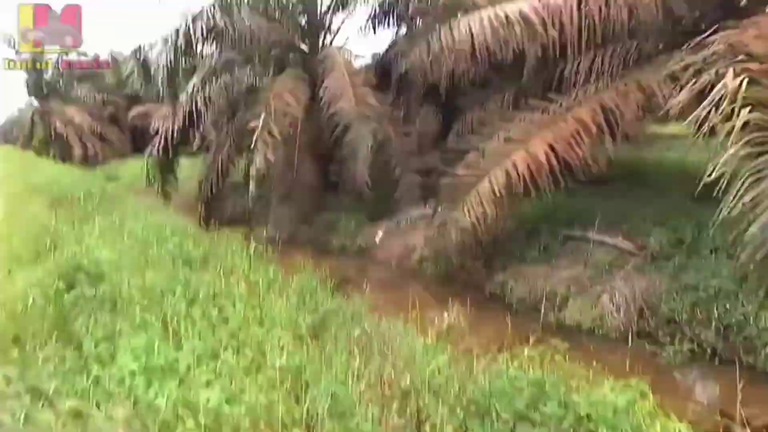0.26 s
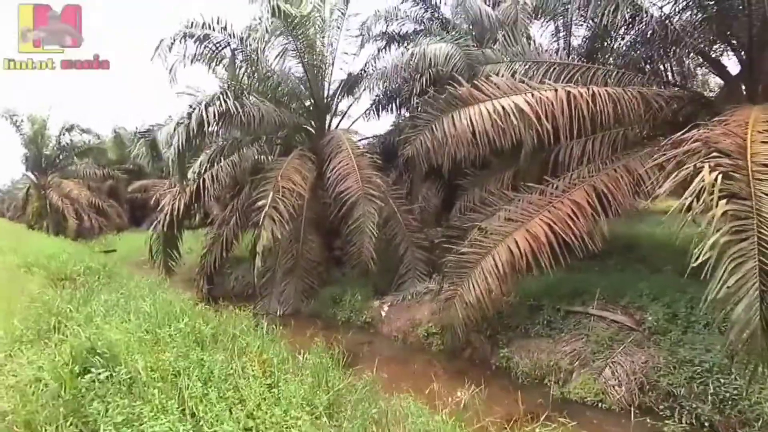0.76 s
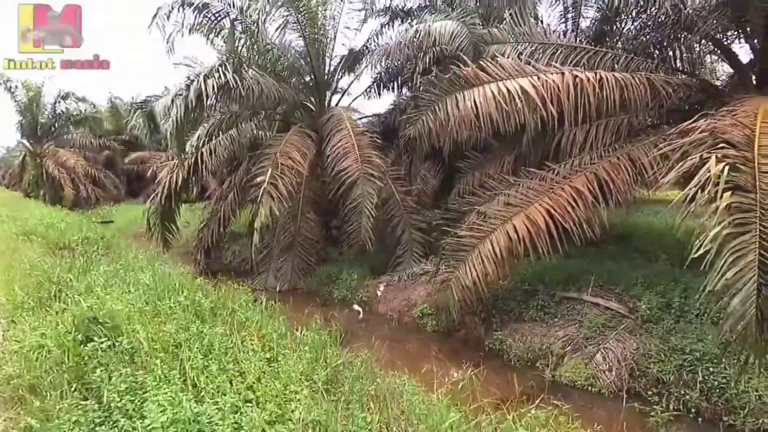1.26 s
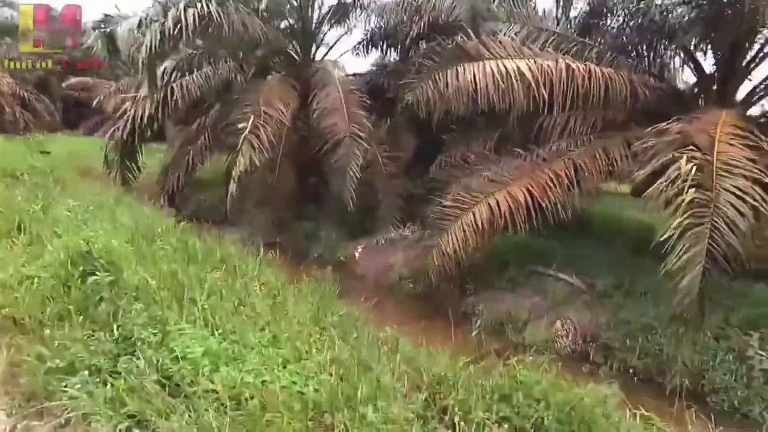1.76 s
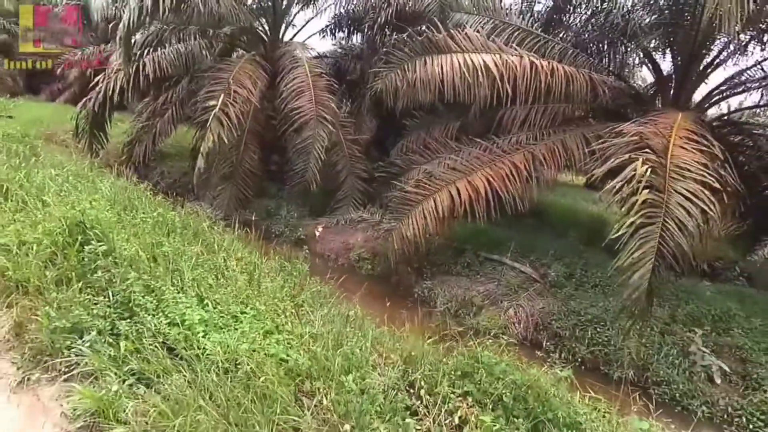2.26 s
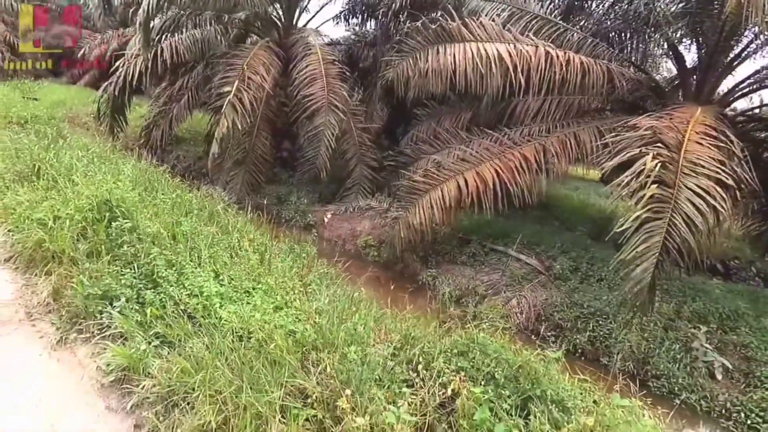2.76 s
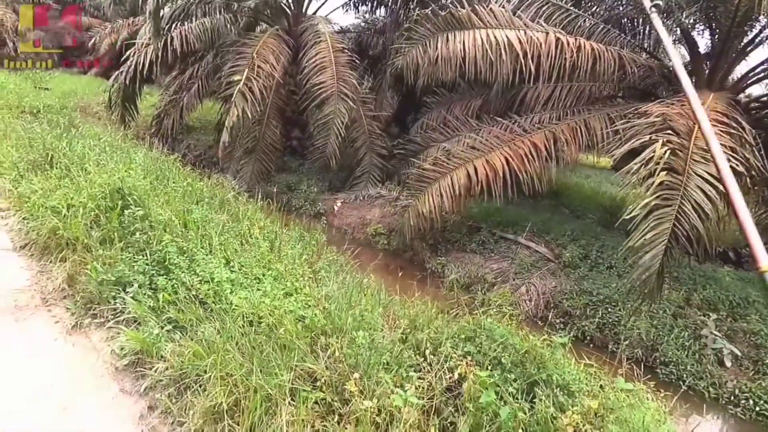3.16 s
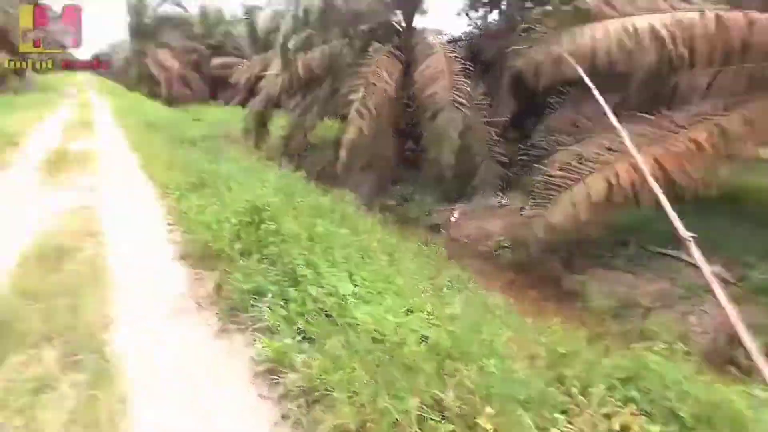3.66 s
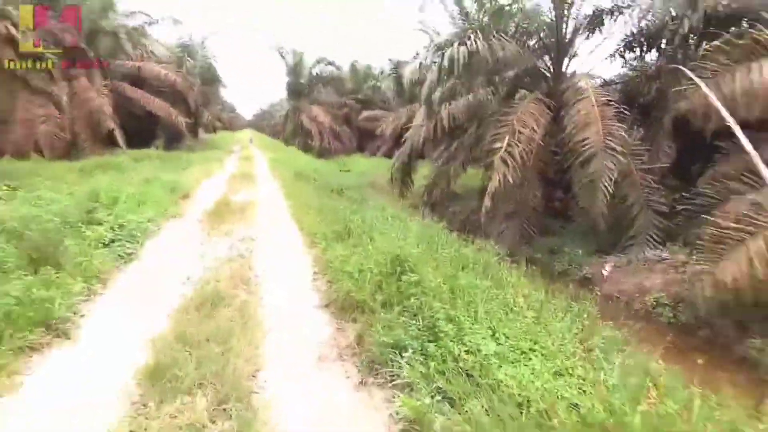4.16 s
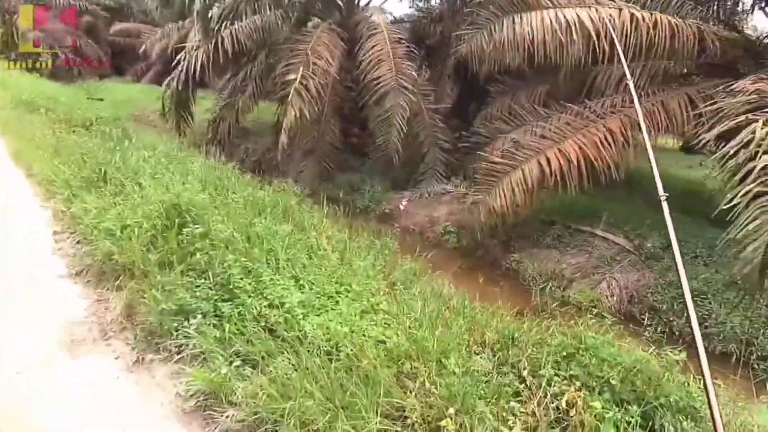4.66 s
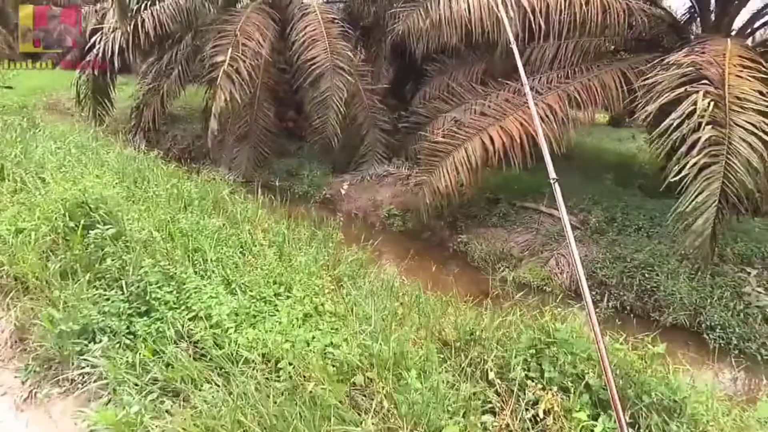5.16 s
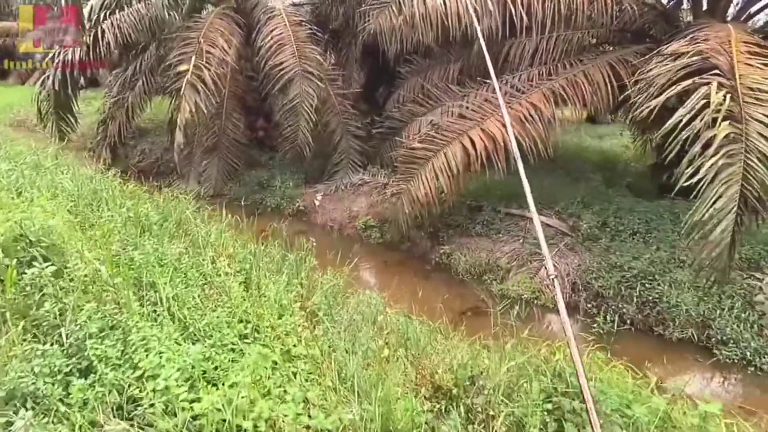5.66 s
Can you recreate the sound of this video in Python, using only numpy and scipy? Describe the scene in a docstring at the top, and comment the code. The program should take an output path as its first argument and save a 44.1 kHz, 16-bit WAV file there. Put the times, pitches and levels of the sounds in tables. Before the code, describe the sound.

Someone walks through dry grass outdoors, soles crunching, stems cracking and gear knocking lightly, while high-pitched insects rasp continuously around.

```python
"""Soft footsteps close to the microphone: someone with a fishing rod steps from a grass verge onto a dirt track.
Soles crunch and blades swish as shaped noise grains; dry stalks snap and tear; carried gear knocks as short
damped tones; one boot scuffs through stubble as stick-slip noise on ringing modes.
The place is a palm plantation: insects, as noise in high bands, hiss and crackle over very quiet open air."""
import sys
import numpy as np
from scipy import signal
from scipy.fft import rfft, irfft
from scipy.io import wavfile
from scipy.ndimage import uniform_filter1d, map_coordinates

SR = 44100
rng = np.random.default_rng(int(sys.argv[2]) if len(sys.argv) > 2 else 0)


def bounce(signal):
    """Save signal as a 16-bit WAV file at the path given by the first command-line argument."""
    frames = np.transpose(np.atleast_2d(signal))
    limited = np.clip(frames, -1, 1)
    pcm = np.round(limited * 32767).astype(np.int16)
    wavfile.write(sys.argv[1], SR, pcm)


N = 261072
TIME = np.arange(N) / SR


def from_db(db):
    """Decibels to gain."""
    return 10 ** (np.asarray(db) / 20)


def rms_one(x):
    """Scale to unit power."""
    return x / np.sqrt(np.mean(x ** 2) + 1e-20)


def in_time(rows):
    """Each column of a curve, sample by sample."""
    s, *columns = np.transpose(rows)
    return [np.interp(TIME, s, c) for c in columns]


def at_hz(points, hz):
    """Read a spectrum on a log-frequency axis."""
    f, value = np.transpose(points)
    return np.interp(np.log(np.maximum(hz, 1)), np.log(f), value)


def pan(balance_db):
    """Channel gains for a left-minus-right level."""
    return from_db(np.array([[.5], [-.5]]) * balance_db)


def drift(rate):
    """Smooth chance of spread 1 that changes about rate times a second."""
    knots = rng.standard_normal(4096)
    return rms_one(map_coordinates(knots, [TIME * rate], order=2, mode="wrap"))


def swell(s, db, half_s):
    """A bell-shaped gain round time s."""
    return from_db(db) * np.exp(-.5 * ((TIME - s) / half_s) ** 2)


def resonate(x, hz, width_hz):
    """A two-pole resonance with gain 1 on top."""
    r = np.exp(-np.pi * width_hz / SR)
    zeros = np.array([1, 0, -1]) * (1 - r * r) / 2
    poles = [1, -2 * r * np.cos(2 * np.pi * hz / SR), r * r]
    return signal.lfilter(zeros, poles, x + 1e-18)


def band(x, hz, width_hz):
    """A resonance applied twice: steep skirts."""
    return resonate(resonate(x, hz, width_hz), hz, width_hz)


def evened(x):
    """Hold unit power over every fortieth of a second, keeping the finer grain."""
    return x / np.sqrt(np.abs(uniform_filter1d(x ** 2, size=SR // 40)) + 1e-20)


def grains(per_s, spread_db, grain_s, bed):
    """Two noises broken into tiny bursts of uneven size, over a bed of bursts too many to tell apart."""
    sizes = from_db(spread_db * np.minimum(rng.exponential(1, N), 4))
    hits = (rng.random(N) < per_s / SR) * sizes ** 2
    power = signal.lfilter([1], [1, -np.exp(-2 / (grain_s * SR))], hits + 1e-18)
    return rng.standard_normal((2, N)) * np.sqrt(power / power.mean() + abs(bed))


def patchy(pair, depth_db, patch_s, patch_hz):
    """Random peaks and dips come and go across the spectrum of a noise."""
    hz, s, cells = signal.stft(pair, SR, nperseg=512)
    patches = rng.standard_normal((256, 1024))
    places = np.meshgrid(hz / patch_hz, s / patch_s, indexing="ij")
    field = map_coordinates(patches, places, order=2, mode="wrap")
    return signal.istft(cells * from_db(depth_db * field), SR, nperseg=512)[1][:, :N]


# how alike left and right arrive, before a sound's own spread: f/Hz, likeness (1 same, -1 opposed)
STEREO_LIKENESS = [(40, 0.58), (200, 0.96), (1000, 0.85), (2000, 0.53), (3200, 0.45), (5000, 0.23),
                   (8000, -0.15), (15000, 0.34)]


def colour(pair, spectrum, spread=1):
    """Give two noises a spectrum and mix them to left and right with the likeness above; unit power."""
    hz = np.arange(N // 2 + 1) * SR / N
    mid, side = rfft(pair) * from_db(at_hz(spectrum, hz))
    alike = np.clip(at_hz(STEREO_LIKENESS, hz) / spread, -.98, .98)
    common = np.sqrt(1 + alike) * mid
    opposed = np.sqrt(1 - alike) * side * [[1], [-1]]
    return rms_one(irfft(common + opposed, N))


def add(out, s, sound):
    """Mix a short sound in at time s."""
    start = round(s * SR)
    out[:, start:start + sound.shape[-1]] += sound[..., :N - start]


def small_body(x, low_hz=260):
    """Small things radiate hardly any bass."""
    return signal.sosfilt(signal.butter(2, low_hz, "high", fs=SR, output="sos"), x + 1e-18)


# colour of the open air: f/Hz, relative level/dB per Hz
AIR_COLOUR = [(25, -17), (105, -11.5), (140, -0.5), (180, -10), (350, 0.5), (700, -2.5), (1600, -5),
              (2400, -17), (4000, -10), (6000, -35), (12000, -6)]


def open_air(level_db=-60):
    """The faint, wide rush of the plantation: steady coloured noise."""
    return from_db(level_db) * colour(rng.standard_normal((2, N)), AIR_COLOUR, spread=2.8) * pan(0.33)


# farther insect choirs: f/Hz, width/Hz, level/dB before rise and waver, left-minus-right/dB
FAR_CHOIRS = [(3000, 380, -69.5, 3), (4500, 540, -65.5, 1.5), (6870, 590, -59.5, -3.5),
              (7380, 700, -59, -7.5)]


def choirs(waver_db=0.76, rise_db_per_s=0.25):
    """Farther insects blur into steady bands, each round its own pitch, and slowly grow louder."""
    out, rise_db = np.zeros((2, N)), rise_db_per_s * (TIME - TIME.mean())
    for hz, width_hz, db, balance_db in FAR_CHOIRS:
        song = rms_one(band(rng.standard_normal((2, N)), hz, width_hz))
        out += song * from_db(db + rise_db + waver_db * drift(rate=23)) * pan(balance_db)
    return out


# steady rasp of the shrill insects: t/s, level/dB before near_db and flutter
RASP_LEVEL = [(0.0, -50.5), (0.43, -52.5), (0.9, -55), (1.45, -52), (1.75, -48.5), (2.2, -48),
              (2.47, -49.5), (2.88, -48), (3.43, -45.5), (4.0, -49), (4.7, -49.5), (5.3, -50),
              (5.92, -52.5)]
# colour of the rasp: f/Hz, relative level/dB per Hz
RASP_COLOUR = [(7000, -57), (9500, -25), (11500, -16), (13000, -10), (14200, -2.5), (15150, 0.5),
               (16000, 4.5)]
# the nearest insect rasps harder for a moment: t/s, level/dB relative to the steady rasp it adds to
NEAR_CHIRRS = [(0.15, -1), (0.355, -2), (0.5, -7), (0.66, -12), (0.82, -1), (1.015, 2), (1.16, -6),
               (1.29, -2), (1.395, -4), (2.1, -17), (2.35, -7), (2.56, -5), (2.75, -2), (3.13, -14),
               (3.69, -12), (3.87, -9), (4.09, -7), (4.27, -8), (4.47, -4), (4.66, -6), (4.83, -5),
               (5.01, -6), (5.22, -4), (5.41, -5), (5.61, -3), (5.79, 0)]
CHIRR_HALF_S = 0.03
WING_STROKES_PER_S = 48  # on average
BUZZ_S, BUZZ_DB = 4.2425, 5  # one short, sharp wing buzz; level relative to the steady rasp


def shrill_insects(near_db=8.0, flutter_db=-0.5, stroke_depth=.18):
    """Insects in the grass to the right rasp their wings: ticks pulse with each stroke and surge in chirrs."""
    level_db, = in_time(RASP_LEVEL)
    chirrs = sum(swell(s, db, CHIRR_HALF_S) for s, db in NEAR_CHIRRS)
    surge = 1 + chirrs + swell(BUZZ_S, BUZZ_DB, half_s=.002)
    stroke_rate = WING_STROKES_PER_S * (1 + .07 * drift(rate=12))
    strokes = 1 + stroke_depth * np.sin(2 * np.pi * np.cumsum(stroke_rate) / SR)
    level = from_db(level_db + near_db + flutter_db * drift(rate=120))
    ticks = grains(per_s=520, spread_db=2.5, grain_s=.0008, bed=.6)
    return surge * strokes * level * colour(ticks, RASP_COLOUR) * pan(-9.5)


# handling jolts the microphone: t/s, level/dB, half length/s
MIC_JOLTS = [(0.36, -70, 0.03), (1.607, -68, 0.031), (2.043, -76, 0.023), (5.307, -77, 0.035)]


def handling(hz=50, width_hz=110):
    """A jolt reaches the microphone as a faint, brief rumble."""
    jolts = sum(swell(s, db, half_s) for s, db, half_s in MIC_JOLTS)
    return jolts * rms_one(band(rng.standard_normal((2, N)), hz, width_hz))


# how hard the legs push through the grass; only departures from the mean count: t/s, level/dB
LEG_PUSH = [(0, -51.5), (0.08, -67), (0.35, -54), (0.65, -56.5), (0.85, -57.5), (1.0, -52), (1.08, -56.5),
            (1.2, -53), (1.45, -52.5), (1.55, -48), (2.2, -49.5), (2.37, -50.5), (2.41, -58), (2.54, -57),
            (2.57, -56), (2.77, -50.5), (3.44, -51), (3.72, -64), (4.27, -60), (4.66, -54), (4.79, -60),
            (4.97, -54.5), (5.54, -60.5), (5.92, -62)]
# weight comes onto a foot: t/s, sole crunch level/dB, grass swish level/dB (before blades_db), release/s
FOOT_LOADS = [(0.41, -51, -55.5, 0.09), (0.736, -55, -54, 0.025), (0.954, -64, -67, 0.11),
              (1.145, -53, -51.5, 0.034), (1.365, -55.5, -49.5, 0.029), (1.63, -48, -73, 0.16),
              (1.79, -46, -48, 0.061), (2.0, -53.5, -56, 0.039), (2.236, -46, -64, 0.062),
              (2.366, -61, -52.5, 0.04), (2.61, -53.5, -57, 0.018), (2.697, -75, -63, 0.063),
              (2.86, -52.5, -54, 0.055), (3.19, -58, -57, 0.022), (3.535, -61, -53, 0.074),
              (3.62, -61.5, -52.5, 0.13), (3.799, -57.5, -49.5, 0.062), (4.383, -56, -55, 0.044),
              (4.504, -62, -53, 0.048), (4.708, -58.5, -55.5, 0.04), (5.311, -60, -53, 0.068)]
LOADING_S = 0.043  # the weight builds up this fast
# level at mean push, then dB per dB of push
SWISH_DB, SWISH_FOLLOWS = -57, 0.98
CRUNCH_DB, CRUNCH_FOLLOWS = -63, 1


def walk():
    """Gains of crunch and swish: both follow the push; each footfall loads quickly and dies away."""
    push_db, = in_time(LEG_PUSH)
    push_db = push_db - push_db.mean()
    crunch_power = from_db(CRUNCH_DB + CRUNCH_FOLLOWS * push_db) ** 2
    swish_power = from_db(SWISH_DB + SWISH_FOLLOWS * push_db) ** 2
    for s, crunch_db, swish_db, release_s in FOOT_LOADS:
        decay = np.where(TIME < s, ((s - TIME) / LOADING_S) ** 2, (TIME - s) / release_s)
        weight = np.exp(-decay)
        crunch_power = crunch_power + (from_db(crunch_db) * weight) ** 2
        swish_power = swish_power + (from_db(swish_db) * weight) ** 2
    return np.sqrt(crunch_power), np.sqrt(swish_power)


# colour of thin stems, also of the grit under the soles: f/Hz, relative level/dB per Hz
CRACKLE_COLOUR = [(400, -12), (1000, 4.5), (2800, 0), (5500, -6), (10000, -11), (15500, -16)]
CRACKLES_PER_S, CRACKLE_DB = 45, -13  # level relative to the swish gain before blades_db


def crackles(swish):
    """Thin dry stems tick at random as the grass is pushed aside."""
    ticks = grains(per_s=CRACKLES_PER_S, spread_db=2.5, grain_s=.0005, bed=0)
    return swish * from_db(CRACKLE_DB) * colour(ticks, CRACKLE_COLOUR) * pan(3.0)


# single tufts brush a leg: t/s, level/dB, half length/s
TUFT_BRUSHES = [(0.513, -40.5, 0.06), (1.374, -45.5, 0.007), (1.814, -41.5, 0.019), (2.018, -42.5, 0.013),
                (2.106, -42.5, 0.007), (2.148, -44.5, 0.049), (2.872, -46.5, 0.0099), (3.443, -45, 0.01),
                (3.609, -50, 0.011), (4.386, -45, 0.0039), (4.717, -47.5, 0.011), (4.949, -50, 0.011)]
# colours of sliding blades and of tufts: f/Hz, relative level/dB per Hz
SWISH_COLOUR = [(500, -24), (1200, -12.5), (1500, -7.5), (1880, 1), (2300, 0.5), (2700, 4), (3150, 3.5),
                (4000, 2.5), (5200, 4.5), (6500, 2), (8500, 3.5), (11500, 0), (15500, -2.5)]
TUFT_COLOUR = [(400, -23), (1000, -9.5), (1900, -5), (4500, -8), (7000, -6), (10000, -5.5), (15500, -7.5)]


def grass(swish, blades_db=4.0):
    """Blades slide over the legs in countless ticks; a passing tuft adds a swish of its own colour."""
    ticks = grains(per_s=700, spread_db=-3.0, grain_s=0.0081, bed=1.0)
    ticks = patchy(ticks, depth_db=3.5, patch_s=.045, patch_hz=202.7)
    blades = swish * from_db(blades_db) * colour(ticks, SWISH_COLOUR)
    tufts = sum(swell(s, db, half_s) for s, db, half_s in TUFT_BRUSHES)
    tips = grains(per_s=990, spread_db=4.0, grain_s=0.000095, bed=4.5)
    return (blades + tufts * colour(tips, TUFT_COLOUR)) * pan(-2.1)


# rubs of cloth and matted leaves: t/s, level/dB, half length/s, f/Hz, width/Hz
CLOTH_LEAF_RUBS = [(0.19, -63.5, 0.043, 3050, 600), (0.465, -47, 0.003, 1200, 1500),
                   (0.508, -40, 0.005, 2930, 700), (0.739, -51.5, 0.015, 3050, 900),
                   (0.74, -57.5, 0.019, 1150, 800), (0.774, -59, 0.075, 1720, 500),
                   (0.903, -58, 0.098, 2830, 900), (0.94, -52, 0.021, 1080, 1140),
                   (1.17, -59.5, 0.067, 1870, 900), (1.198, -54, 0.019, 990, 300),
                   (1.29, -51, 0.0099, 1090, 905), (1.365, -55.5, 0.016, 1000, 1200),
                   (1.596, -47.5, 0.017, 1710, 1500), (1.64, -49, 0.017, 330, 600),
                   (1.696, -50.5, 0.042, 550, 600), (1.87, -53, 0.091, 670, 810),
                   (2.013, -49.5, 0.0092, 1310, 1200), (2.598, -57.5, 0.013, 840, 300),
                   (2.573, -53.5, 0.008, 2700, 2500), (2.596, -53, 0.014, 2500, 2200),
                   (2.643, -55, 0.018, 2780, 600), (2.683, -56.5, 0.048, 1160, 900),
                   (2.856, -51, 0.005, 2100, 1500), (2.963, -56.5, 0.095, 1000, 647),
                   (3.31, -70, 0.11, 980, 400), (3.547, -56, 0.0065, 2190, 1500),
                   (3.612, -55.5, 0.0098, 2600, 4000), (4.375, -58.5, 0.01, 1200, 1800),
                   (4.496, -56.5, 0.007, 1410, 1200), (4.72, -62, 0.007, 1200, 2000),
                   (5.253, -60, 0.17, 950, 980), (5.26, -62.5, 0.12, 500, 245),
                   (5.311, -54.5, 0.01, 2680, 1000), (5.345, -59, 0.012, 1600, 1000),
                   (5.58, -66.5, 0.12, 2990, 400)]


def rubs():
    """Brief, grainy friction that keeps to one pitch region; each rub starts elsewhere in the grains."""
    out, friction = 0, grains(per_s=380, spread_db=2.8, grain_s=0.0015, bed=.6)[0]
    for s, db, half_s, hz, width_hz in CLOTH_LEAF_RUBS:
        shifted = np.roll(friction, rng.integers(N))
        out = out + swell(s, db, half_s) * evened(band(shifted, hz, width_hz))
    return out * pan(-6.0)


# dry stalks snap; the row at 5.615 is the rattle of a gear knock:
# t/s, crack level/dB, crack f/Hz, crack width/Hz, woody knock level/dB, splinter time/s
SNAPS_AND_RATTLE = [(0.4013, -29, 2740, 700, -37, 0.0015), (0.4055, -28, 2790, 450, -37, 0.0056),
                    (0.4075, -32, 2840, 600, -46, 0.002), (0.416, -32.5, 1210, 1100, -39, 0.0098),
                    (0.4193, -37, 1390, 1440, -48, 0.0052), (0.565, -27, 12000, 12000, -34, 0.009),
                    (0.9847, -32.5, 2190, 2500, -28.5, 0.0036), (1.1345, -26.5, 3000, 9050, -32.5, 0.0014),
                    (1.1742, -32, 2400, 5030, -42, 0.0022), (1.2923, -34, 4500, 7000, -50, 0.0022),
                    (1.2959, -23.5, 5900, 12100, -34.5, 0.0022), (1.5307, -23, 5460, 9000, -35.5, 0.0032),
                    (1.6225, -16, 4530, 9000, -26, 0.0017), (1.7011, -26, 2340, 1210, -48, 0.0037),
                    (1.7026, -26, 8000, 11000, -50, 0.0043), (2.2213, -24.5, 3860, 3970, -29.5, 0.0025),
                    (2.227, -39, 2700, 1200, -41, 0.0032), (2.842, -21.5, 8750, 9000, -48, 0.0016),
                    (2.846, -31.5, 6300, 3500, -56, 0.003), (3.527, -42, 3000, 5000, -44, 0.002),
                    (3.564, -41, 2300, 1200, -50, 0.003), (3.598, -40, 4000, 6000, -49, 0.002),
                    (3.7985, -36, 7000, 10000, -57, 0.0006), (4.3784, -34.5, 2190, 3500, -41, 0.0064),
                    (4.3868, -33, 5000, 10000, -53, 0.0015), (4.9492, -30, 7000, 10000, -69, 0.0006),
                    (5.3025, -45, 2780, 1500, -54, 0.004), (5.312, -41, 2600, 900, -54, 0.005),
                    (5.3555, -39.5, 1240, 600, -48, .004), (5.615, -55, 1500, 2500, -41, 0.012)]
# heavily damped stalk modes, before each stalk's thinness shifts them: f/Hz, level/dB, t60/s
STALK_MODES = [(640, -6, 0.012), (930, -7, 0.014), (1330, -10, 0.011), (1850, -10, 0.009),
               (2700, -13, 0.007)]
TEARS_PER_S, TEAR_STRENGTH = 1600, .35  # fibres giving way, before they die out with the splinter time
WOOD_HZ, WOOD_WIDTH_HZ = 1050, 2430  # the range in which a stalk radiates well


def snaps(splinter_db=-11):
    """A stalk cracks sharply, its last fibres tear and knock on the woody body; one gear rattle is made alike."""
    out, t = np.zeros((2, N)), TIME[:SR // 20]
    for s, crack_db, hz, width_hz, wood_db, splinter_s in SNAPS_AND_RATTLE:
        thinness = np.exp(.08 * rng.standard_normal())
        body = sum(from_db(db - 60 * t / t60) * np.cos(2 * np.pi * f * thinness * t)
                   for f, db, t60 in STALK_MODES)
        fade = np.exp(-t / splinter_s)
        chance = rng.random(len(t)) < TEARS_PER_S / SR
        tears = (t == 0) + TEAR_STRENGTH * chance * rng.standard_normal(len(t)) * fade
        wood = band(signal.fftconvolve(tears, body)[:len(t)], WOOD_HZ, WOOD_WIDTH_HZ)
        wood = rms_one(wood) * np.std(body)
        crack = band(1. * (t == 0), hz, width_hz)
        # one noise shared by both channels plus one of each channel's own
        splinters = rng.standard_normal(len(t)) + rng.standard_normal((2, len(t)))
        fibres = rms_one(band(splinters, hz, width_hz)) * fade
        sharp = crack / np.abs(crack).max() + from_db(splinter_db) * fibres
        add(out, s, from_db(crack_db) * sharp + from_db(wood_db) * wood)
    return out * pan(-3.7)


# dull knocks of soles and gear: t/s, level/dB, f/Hz, swell/s, rattle level/dB
GEAR_KNOCKS = [(0.2742, -50.5, 610, 0.0022, -54), (0.355, -47, 370, 0.0014, -46.5),
               (0.538, -43, 740, 0.0037, -55), (0.5643, -41.5, 530, 0.0023, -52),
               (0.7085, -41, 605, 0.0017, -46), (0.778, -45.5, 570, 0.0011, -48),
               (1.0857, -50, 665, 0.002, -58), (1.2594, -49, 1020, 0.00079, -61),
               (1.562, -45, 510, .0014, -43), (1.614, -34, 724, 0.00046, -56),
               (1.634, -29.5, 694, 0.0013, -49), (1.65, -43, 680, 0.0008, -55),
               (1.669, -40, 725, 0.001, -52), (1.7849, -41, 497, 0.0021, -52),
               (2.238, -40.5, 600, 0.0023, -57), (2.251, -47, 557, .0014, -53),
               (2.2668, -53, 520, 0.0012, -51), (2.2845, -34.5, 515, 0.0021, -60),
               (2.3677, -45, 1210, 0.00092, -49), (3.3705, -44.5, 950, 0.00067, -59),
               (3.556, -44.5, 680, 0.00087, -51), (3.621, -49, 1110, 0.0015, -56),
               (4.107, -55, 900, 0.00052, -57), (4.1118, -50, 620, 0.0014, -61),
               (4.626, -51, 485, 0.0019, -65), (4.639, -50.5, 540, 0.0016, -67),
               (5.357, -50, 524, 0.0015, -55), (5.489, -50, 536, 0.0027, -54),
               (5.518, -54, 514, 0.0016, -56), (5.533, -46.5, 1090, 0.00027, -54),
               (5.619, -36, 596, 0.0012, -44), (5.647, -47, 554, 0.0012, -54),
               (5.7342, -54, 1150, 0.00087, -67), (5.7555, -51, 1000, 0.00038, -60),
               (5.904, -54.5, 576, 0.0017, -63)]


def knocks(upper_ratio=1.89, upper_db=-12, rattle_hz=780, rattle_width_hz=850, settle_s=0.0063):
    """A soft contact swells and dies within a few cycles, while loose bits rattle and settle."""
    out, t = np.zeros((2, N)), TIME[:SR // 20]
    for s, db, hz, swell_s, rattle_db in GEAR_KNOCKS:
        contact = t / swell_s * np.exp(1 - t / swell_s)
        upper = from_db(upper_db) * np.sin(2 * np.pi * hz * upper_ratio * t)
        modes = np.sin(2 * np.pi * hz * t) + upper
        rattle = rms_one(band(rng.standard_normal(len(t)), rattle_hz, rattle_width_hz))
        rattle = rattle * np.exp(-t / settle_s) * (1 - np.exp(-t / swell_s))
        add(out, s, from_db(db) * contact * modes + from_db(rattle_db) * rattle)
    return out * pan(-5.5)


# a heel lands on soft earth: t/s, level/dB before the soft onset, f/Hz, t60/s
HEEL_THUDS = [(0.354, -47, 104, 0.04), (1.613, -37, 307, 0.032), (1.626, -42.5, 146, 0.14),
              (1.744, -39, 240, 0.029), (3.179, -42, 328, 0.041), (3.551, -41, 316, 0.035),
              (4.109, -38, 192, 0.015)]


def heels(rise_s=0.0068):
    """Soft earth answers a heel with a low, short thud."""
    out, t = np.zeros((2, N)), TIME[:SR // 4]
    for s, db, hz, t60 in HEEL_THUDS:
        onset = 1 - np.exp(-t / rise_s)
        add(out, s, from_db(db - 60 * t / t60) * onset * np.sin(2 * np.pi * hz * t))
    return out * pan(-6.0)


# the hollow boot rings as it drags: f/Hz, width/Hz, level/dB before the drag pitch favours some modes
BOOT_MODES = [(1870, 38, -1.5), (2180, 75, -5), (2630, 130, -10), (2820, 210, -2.5), (2990, 110, -8),
              (3500, 50, 0), (4520, 140, -1)]
# the pitch that the dragging sole excites most climbs with its speed: t/s, f/Hz
FAVOURED_PITCH = [(0.485, 1850), (0.499, 2220), (0.507, 2900), (0.55, 3000)]
# colour of the scrape: f/Hz, relative level/dB per Hz
SCRAPE_COLOUR = [(40, -40), (120, -28), (380, -7), (600, -9), (1000, -5), (1450, -9), (2000, -14),
                 (3000, -5), (3900, -24), (6000, -12.5), (10000, -35), (15500, -17)]
# middle of the fastest stretch, its level before rasp_db and ring_db, and its hold before and after
SCUFF_S, SCUFF_DB, SCUFF_HOLD_S = 0.495, -37.5, 0.012
SCUFF_RISE_DB_PER_S, SCUFF_FALL_DB_PER_S = 420, 194


def scuff(rasp_db=-4.0, ring_db=-2.0, focus_hz=450, off_pitch_db=-9):
    """A sole drags through stubble, sticking and slipping; as it speeds up, ever higher boot modes ring."""
    early_s = np.maximum(SCUFF_S - SCUFF_HOLD_S - TIME, 0)
    late_s = np.maximum(TIME - SCUFF_S - SCUFF_HOLD_S, 0)
    level_db = SCUFF_DB - SCUFF_RISE_DB_PER_S * early_s - SCUFF_FALL_DB_PER_S * late_s
    rasp, slips = [colour(grains(per_s=900, spread_db=1.5, grain_s=.0012, bed=.9), SCRAPE_COLOUR)
                   for _ in range(2)]
    drag_hz, = in_time(FAVOURED_PITCH)
    ring = 0
    for hz, width_hz, db in BOOT_MODES:
        drive = from_db(off_pitch_db) + np.exp(-((hz - drag_hz) / focus_hz) ** 2)
        ring = ring + from_db(db) * drive * evened(resonate(slips, hz, width_hz))
    both = from_db(rasp_db) * rasp + from_db(ring_db) * rms_one(ring)
    return from_db(level_db) * both * pan(-5.5)


# colour of the crunch: f/Hz, relative level/dB per Hz
CRUNCH_COLOUR = [(40, -22), (120, -26), (230, -7.5), (330, -2.5), (390, -4), (490, 1.5), (650, -3.5),
                 (950, 2), (1250, -4), (1800, -6.5), (3000, -6), (6000, -13)]
GRIT_DB = -9  # crisp little cracks under the sole, relative to its crunch


def soles(crunch):
    """Crumbs of earth and matted stems give way under the weight, with crisp little cracks among them."""
    crumbs = grains(per_s=750, spread_db=3.0, grain_s=0.0013, bed=0.5)
    crumbs = patchy(crumbs, depth_db=2.5, patch_s=.04, patch_hz=231)
    grit = grains(per_s=170, spread_db=2.0, grain_s=.0004, bed=0)
    underfoot = colour(crumbs, CRUNCH_COLOUR) + from_db(GRIT_DB) * colour(grit, CRACKLE_COLOUR)
    return crunch * underfoot * pan(-5.5)


def scene():
    """The walker close by, insects and air all round; no walls to echo."""
    background = open_air() + choirs() + shrill_insects()
    crunch, swish = walk()
    legs = crackles(swish) + grass(swish) + rubs()
    hard_contacts = small_body(snaps() + knocks())
    feet = heels() + scuff() + soles(crunch)
    return background + handling() + legs + hard_contacts + feet


CUTOFF_HZ = 15400


def record(dry):
    """The microphone's top is cut steeply."""
    return signal.sosfilt(signal.ellip(12, .2, 80, CUTOFF_HZ, fs=SR, output="sos"), dry)


dry = scene()
out = record(dry)
bounce(out)
```